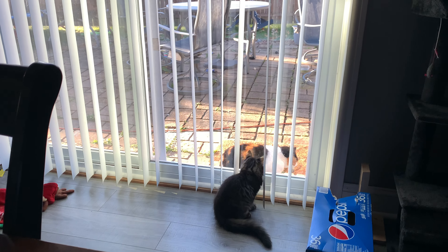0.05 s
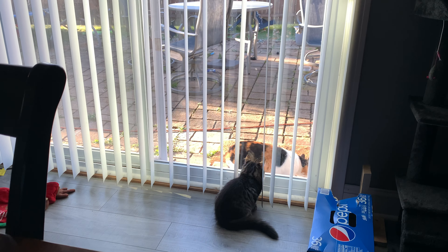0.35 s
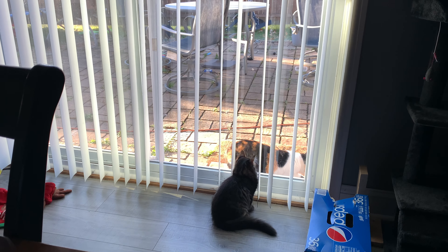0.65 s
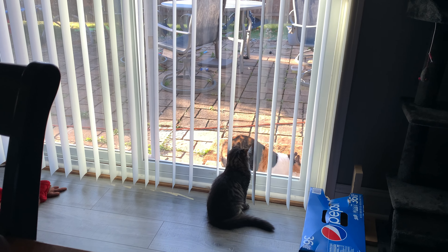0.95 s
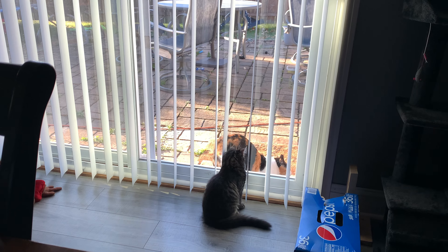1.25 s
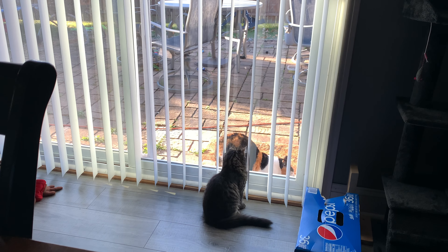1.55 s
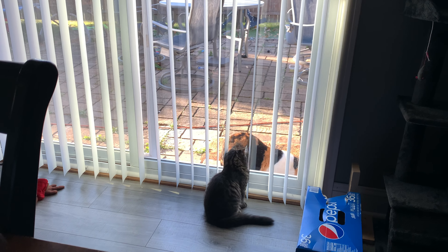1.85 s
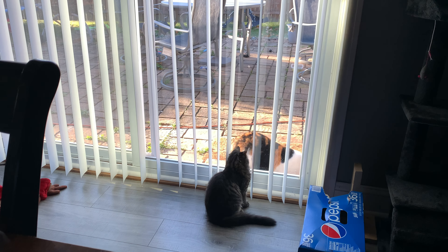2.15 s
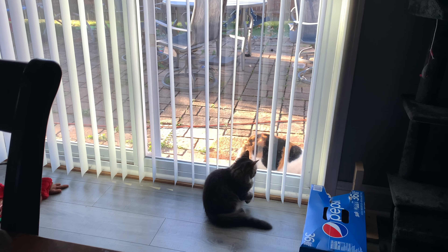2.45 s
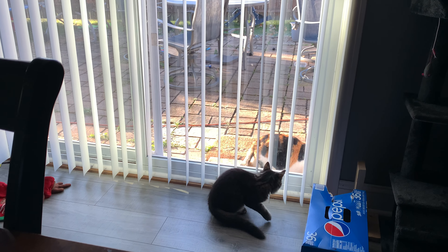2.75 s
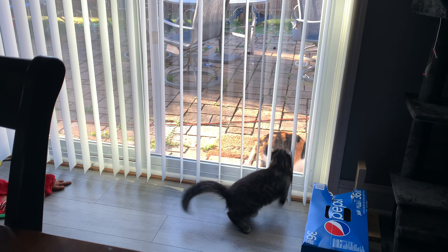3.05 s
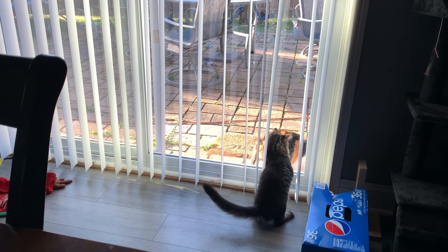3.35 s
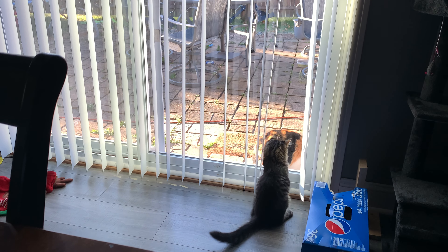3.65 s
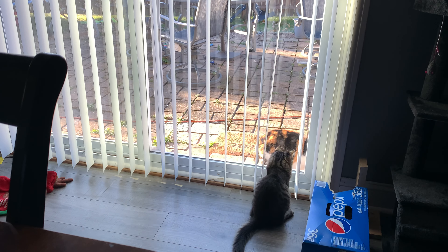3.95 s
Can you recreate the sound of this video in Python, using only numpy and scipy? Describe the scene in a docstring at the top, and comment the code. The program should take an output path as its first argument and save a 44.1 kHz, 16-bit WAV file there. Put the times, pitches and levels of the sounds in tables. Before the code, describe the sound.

One loud thump of a kitten against a glass door and blinds is the main sound. For the first 3 seconds there is only a quiet, steady low rumble, with a few tiny ticks from 1.5 seconds. Paws scuff softly just after 3 seconds. At about 3.2 the pane thumps and the slats clack sharply, ringing for a third of a second. Faint rustles follow over the rumble.

```python
"""A kitten lunges at a glass door

In a quiet room a kitten pushes off the floor and lunges through vertical blinds at the door.
The pane thumps in its normal modes, the slats clack against it, and the hard room rings for about a
third of a second. Faint rustles and ticks come before and after, over a low steady rumble."""
import sys
import numpy as np
from scipy import signal
from scipy.fft import rfft, irfft
from scipy.io import wavfile
from scipy.ndimage import uniform_filter1d

SR = 44100
rng = np.random.default_rng(int(sys.argv[2]) if len(sys.argv) > 2 else 0)


def file_out(sig):
    """Save sig as 16-bit WAV at sys.argv[1]."""
    # one column per channel
    cols = np.atleast_2d(sig).T
    # limit, then scale
    lim = np.clip(cols, -1, 1)
    pcm = np.round(lim * 32767).astype(np.int16)
    wavfile.write(sys.argv[1], SR, pcm)


N = 176400


def amp(db):
    """Amplitude grows tenfold every 20 dB."""
    return 10 ** (np.asarray(db) / 20)


def read(points, hz):
    """Interpolation on a log-frequency axis."""
    f, value = np.transpose(points)
    return np.interp(np.log(hz + 1), np.log(f + 1), value)


def unit(x):
    """Normalisation to rms 1."""
    return x / np.sqrt(np.mean(x ** 2) + 1e-30)


def add(mix, s, sound):
    """Superposition of a sound on the mix at time s."""
    part = mix[:, max(round(s * SR), 0):][:, :sound.shape[-1]]
    part += sound[..., :part.shape[1]]


# Each row: frequency in Hz, left-right coherence from 0 to 1.
COHERENCE = [(330, 1), (450, .98), (640, .85), (900, .45), (1400, .1), (15000, 0)]
def noise(size):
    """Partly coherent stereo noise: alike in the bass, unrelated in the treble."""
    a, b = rfft(rng.standard_normal((2, size)))
    coherence = np.clip(read(COHERENCE, np.fft.rfftfreq(size, 1 / SR)), -1, 1)
    mid, side = a * np.sqrt((1 + coherence) / 2), b * np.sqrt((1 - coherence) / 2)
    return irfft(np.array([mid + side, mid - side]), size)


def colour(x, tone, size=4096):
    """A minimum-phase filter of unit energy imposes the given spectrum."""
    log_gain = np.log(amp(read(tone, abs(np.fft.fftfreq(size, 1 / SR)))))
    taps = np.fft.ifft(np.exp(np.conj(signal.hilbert(log_gain)))).real[:size // 2]
    return signal.oaconvolve(x, taps[None] / np.linalg.norm(taps), axes=1)[:, :x.shape[1]]


def contacts(rows, decay_s):
    """Each contact releases its energy as an exponentially decaying noise burst."""
    out, t = np.zeros((2, N)), np.arange(SR // 10) / SR
    for start, db in rows:
        burst = noise(len(t)) * np.exp(-t / decay_s)
        add(out, start, amp(db) * unit(burst) / np.sqrt(len(t)))
    return out


def strokes(rows, skew=0.45, grain_db=3):
    """Friction makes grainy noise that swells and fades; a small skew makes it peak early."""
    out = np.zeros((2, N))
    for start, length, db in rows:
        progress = np.arange(0, 1, 1 / (length * SR))
        swell = abs(np.sin(np.pi * progress ** skew))
        grains = amp(grain_db * unit(uniform_filter1d(rng.standard_normal(SR), size=60)))
        add(out, start, amp(db) * unit((noise(SR) * grains)[:, :len(swell)] * swell))
    return out


# Background spectrum. Each row: frequency in Hz, spectral density in dB.
BACKGROUND_TONE = [(20, -35.5), (32, -13.5), (45, -2.5), (56, -1.5), (72, -5.5), (92, -13.5), (118, -11),
                   (150, -22), (225, -23), (320, -27.5), (520, -39), (1050, -45), (3000, -52.5),
                   (5000, -54), (7300, -59.5), (8500, -50), (10000, -50.5), (12500, -56), (15000, -57.5)]
# Hums. Each row: centre in Hz, half-width in Hz, level in dB.
HUM_BANDS = [(54.5, 7.7, -59.5), (119, 6, -72.5), (220, 15, -76.5)]
def room_tone(level_db=-57):
    """Steady rumble and hiss, with hums that waver because narrow-band noise beats within itself."""
    hz = np.fft.rfftfreq(N, 1 / SR)
    out = amp(level_db) * unit(irfft(rfft(noise(N)) * amp(read(BACKGROUND_TONE, hz)), N))
    for centre, width, db in HUM_BANDS:
        band = rfft(rng.standard_normal(N)) / (1 + ((hz - centre) / width) ** 4)
        out += amp(db) * unit(irfft(band, N))
    return out


# Room decay. Each row: frequency in Hz, time to fall 60 dB in seconds.
REVERB_T60 = [(100, 0.96), (400, 0.2966), (2300, 0.43), (4000, 0.345), (6000, 0.32), (9000, 0.2638),
              (14000, 0.14)]
# Initial spectrum of the reflections. Each row: frequency in Hz, level in dB.
REVERB_TONE = [(100, 10), (290, 14.5), (480, 6.5), (850, 8), (1300, 5), (2500, -1.5), (4000, 0), (5500, 2),
               (8000, 8), (14000, 6)]
def reverberation(x, level_db=-0.5, gap_s=.003, build_s=.0044):
    """A diffuse field decays exponentially, the high treble first."""
    hz, t, spectrum = signal.stft(noise(SR), SR, nperseg=256)
    decay = amp(read(REVERB_TONE, hz)[:, None] - 60 * t / read(REVERB_T60, hz)[:, None])
    tail = signal.istft(spectrum * decay, SR, nperseg=256)[1]
    tail *= np.clip((np.arange(tail.shape[1]) / SR - gap_s) / build_s, 0, 1)
    tail = unit(tail) / np.sqrt(tail.shape[1])  # unit energy
    return amp(level_db) * signal.fftconvolve(x[:1], tail, axes=1)[:, :N]


# Tiny ticks. Each row: start in seconds, level in dB.
TICK_EVENTS = [(1.548, -49), (1.70, -54), (1.815, -51), (1.866, -50), (2.359, -51), (2.389, -55),
               (2.842, -51), (2.943, -55)]
# Their spectrum. Each row: frequency in Hz, level in dB.
TICK_SPECTRUM = [(200, -6), (700, 11), (1300, -4), (2200, -2), (8000, -9), (15000, -22)]
def ticks(decay_s=.001):
    """A brief contact spreads its energy over a wide band."""
    return colour(contacts(TICK_EVENTS, decay_s), TICK_SPECTRUM)


# Each row: start and length in seconds, level in dB, pitch and half-width in Hz.
SQUEAK_BANDS = [(.005, .11, -79.5, 2020, 260), (.31, .11, -87, 2130, 170), (.955, .065, -78, 2010, 160),
                (1.193, .065, -78, 2080, 210), (2.88, .15, -88, 1170, 22), (2.88, .15, -90, 2150, 130),
                (3.613, .09, -77, 2060, 210)]
def squeaks():
    """Noise confined to a narrow band is heard as a thin, fuzzy pitch."""
    out, hz = np.zeros((2, N)), np.fft.rfftfreq(SR, 1 / SR)
    for start, length, db, pitch, width in SQUEAK_BANDS:
        progress = np.arange(0, 1, 1 / (length * SR))
        band = rfft(noise(SR)) / (1 + ((hz - pitch) / width) ** 4)
        swell = np.sin(np.pi * progress ** .6)
        add(out, start, amp(db) * unit(irfft(band)[:, :len(swell)] * swell))
    return out


# Each row: start and length in seconds, level in dB, relative fizz level in dB.
BRUSHES = [(.33, .54, -84, -26), (.438, 0.06, -72.5, -22), (0.496, 0.12, -81, -27),
           (0.949, 0.027, -79, -7.5), (1.186, 0.031, -74, -9), (3.089, .045, -56, -14.5),
           (3.551, 0.039, -74.5, -4.5), (3.616, .04, -70.5, -22)]
# Spectra of the papery body and the fizz. Each row: frequency in Hz, level in dB.
BODY_SPECTRUM = [(400, -16), (1250, -2), (2250, 0), (2600, -12), (4500, -25), (15000, -44)]
FIZZ_SPECTRUM = [(1000, -15.5), (3000, -5.5), (4300, 1), (6500, -3), (8000, -15.5), (15000, -24)]
def rustles():
    """Light friction makes grainy noise; its fizz peaks before its body."""
    body = strokes([row[:3] for row in BRUSHES], skew=.59)
    fizz = strokes([(s, length, db + fizz_db) for s, length, db, fizz_db in BRUSHES], skew=.38)
    return colour(body, BODY_SPECTRUM) + colour(fizz, FIZZ_SPECTRUM)


# One row: start and length in seconds, level in dB.
SOFT_BUMP = (.848, .05, -74.5)
# Its spectrum. Each row: frequency in Hz, level in dB.
BUMP_SPECTRUM = [(200, -7), (600, 5), (1050, 0.5), (1700, -10), (5000, -35)]
def bump():
    """A noise pulse with a gradual onset and little treble sounds soft and dull."""
    return colour(strokes([SOFT_BUMP], skew=.8), BUMP_SPECTRUM)


# Friction strokes. Each row: start and length in seconds, level in dB.
PAW_SHOVES = [(3.039, .026, -50.5), (3.068, .06, -53.5)]
FUR_SWISH = (3.028, 0.148, -61)
SLAT_SCRAPE = (3.150, .028, -35.5)
# Their spectra. Each row: frequency in Hz, level in dB.
PAW_SPECTRUM = [(50, -16), (130, -9.5), (310, 3.5), (480, -4), (640, 1), (800, -7), (1500, -22),
                (15000, -58)]
FUR_SPECTRUM = [(300, -2.5), (3500, -1), (5000, -6), (7000, -14), (9500, -12.5), (15000, -23)]
SCRAPE_SPECTRUM = [(200, -3), (600, -5), (1100, 4), (1700, -5), (3800, -4), (6500, -16), (9500, -14.5),
                   (15000, -23.5)]
def lunge():
    """Friction noise: paws shove the floor, fur brushes the blinds, slats scrape toward the glass."""
    paws = colour(strokes(PAW_SHOVES, skew=.55, grain_db=2.5), PAW_SPECTRUM)
    fur = colour(strokes([FUR_SWISH], skew=.8), FUR_SPECTRUM)
    scrape = colour(strokes([SLAT_SCRAPE], skew=1.6, grain_db=2.5), SCRAPE_SPECTRUM)
    return paws + fur + scrape


# Each row: start in seconds, level in dB, contact time in seconds.
PANE_BLOWS = [(3.147, -10.5, .0055), (3.1715, -10, .0004), (3.188, -12.5, .012)]
# Each row: frequency in Hz, level in dB, time to fall 60 dB in seconds.
DOOR_MODES = [(59, -26.5, .5), (119, -26, .26), (160, -32, .25), (237, -24, .31), (303, -27, .33),
              (452, -34, 0.3), (845, -31, .28), (1125, -27, .33), (1285, -29, .3), (1448, -28, 0.28),
              (1782, -30, .28), (1940, -32, .42), (2105, -30, .38), (2780, -28, .29), (3245, -24, .26),
              (3430, -25, .25), (4460, -31, .25)]
def door(rise_s=.002):
    """Impacts excite the pane's normal modes; the longer the contact, the weaker the high ones."""
    out, t = np.zeros((2, N)), np.arange(SR) / SR
    onset = 1 - np.exp(-t / rise_s)
    for start, db, contact_s in PANE_BLOWS:
        for hz, level, t60 in DOOR_MODES:
            stereo_phase = np.arccos(np.clip(read(COHERENCE, hz), 0, 1)) * rng.uniform(-1, 1, (2, 1))
            mode = amp(db + level - 60 * t / t60) * np.sin(2 * np.pi * hz * t + stereo_phase)
            add(out, start, mode * onset / (1 + (hz * contact_s) ** 2))
    return out


# Slats striking the glass. Each row: start in seconds, level in dB.
SLAT_STRIKES = [(3.1662, 2.5), (3.1676, 0.5), (3.1686, 1), (3.1710, 1), (3.1742, -7), (3.1763, -11)]
# Spectrum of one strike. Each row: frequency in Hz, level in dB.
CRACK_SPECTRUM = [(100, -22), (500, -16), (900, -4), (1400, 1), (2200, 0), (3500, -1), (5200, -8.5),
                  (7000, -20.5), (9500, -20.5), (15000, -28)]
def slat_cracks(level_db=-5.5, decay_s=.0007):
    """A hard impact radiates a broadband pulse; each strike is its own signal."""
    return [amp(level_db) * colour(contacts([row], decay_s), CRACK_SPECTRUM) for row in SLAT_STRIKES]


# Each row: frequency in Hz, level in dB, time to fall 60 dB in seconds.
SLAT_MODES = [(1130, -24, .015), (1420, -19, .015), (1800, -21, .018), (2102, -20, .045), (2350, -16, .04),
              (2885, -18, .022), (3250, -14, .03), (3455, -14, .028), (3830, -22, .012)]
def slat_ring(level_db=-12.5, rise_s=.00037, left_lag_s=.00007):
    """Damped free vibration: each strike leaves the same short ring in the plastic slats."""
    out, t = np.zeros((2, N)), np.arange(SR // 5) / SR
    phases = rng.uniform(0, 2 * np.pi, len(SLAT_MODES))
    lagged_t = t - np.array([[left_lag_s], [0]])
    ring = sum(amp(level - 60 * t / t60) * np.sin(2 * np.pi * hz * lagged_t + phase)
               for (hz, level, t60), phase in zip(SLAT_MODES, phases))
    for start, db in SLAT_STRIKES:
        add(out, start, amp(db + level_db) * ring * np.minimum(t / rise_s, 1))
    return signal.sosfilt(signal.butter(2, 900, "high", fs=SR, output="sos"), out)


def scene(clack_pan_db=-2.5):
    """Direct and reflected sound superpose; each slat stands elsewhere, so has its own reflections."""
    cracks, ring = slat_cracks(), slat_ring()
    soft = lunge() + rustles() + squeaks() + bump()
    ticking = ticks()
    pan = amp(np.array([[clack_pan_db], [-clack_pan_db]]) / 2)
    echo = sum(reverberation(crack) for crack in cracks)
    echo += reverberation(amp(-17) * ring + amp(-4.5) * soft + amp(-14) * ticking)
    return (sum(cracks) + ring) * pan + soft + ticking + door() + echo + room_tone()


# Each row: frequency in Hz, gain in dB.
MIC_RESPONSE = [(20, -0.5), (10800, 0), (11250, -17), (11850, -19), (12400, 4.5), (15000, 0.5)]
def record(dry, cutoff_hz=15250):
    """The microphone acts as a linear filter with a treble notch and a band limit."""
    coloured = irfft(rfft(dry) * amp(read(MIC_RESPONSE, np.fft.rfftfreq(N, 1 / SR))), N)
    lowpass = signal.firwin(511, cutoff_hz, window=("kaiser", 9), fs=SR)
    return signal.oaconvolve(coloured, lowpass[None], "same")


dry = scene()
out = record(dry)
file_out(out)
```